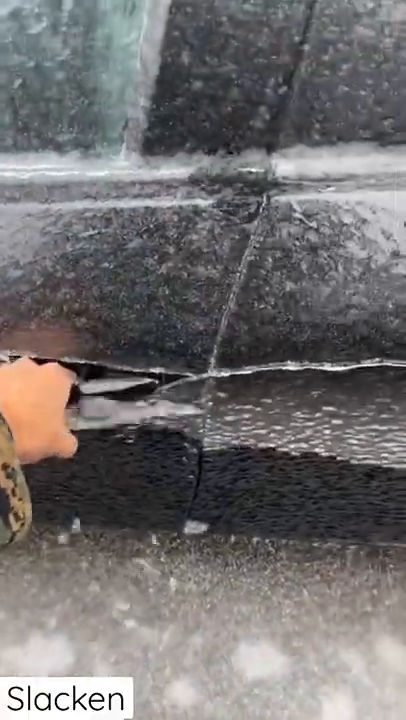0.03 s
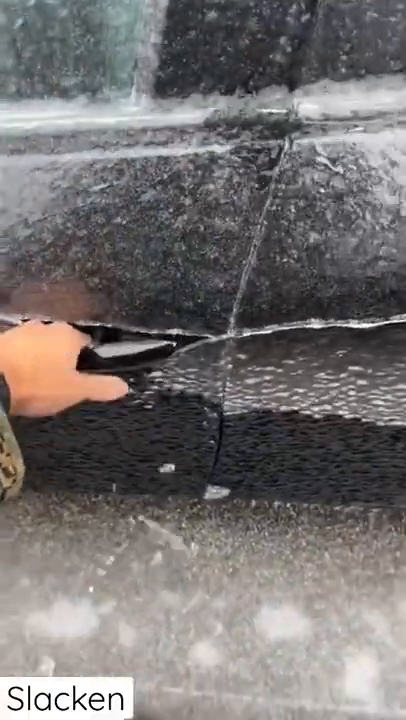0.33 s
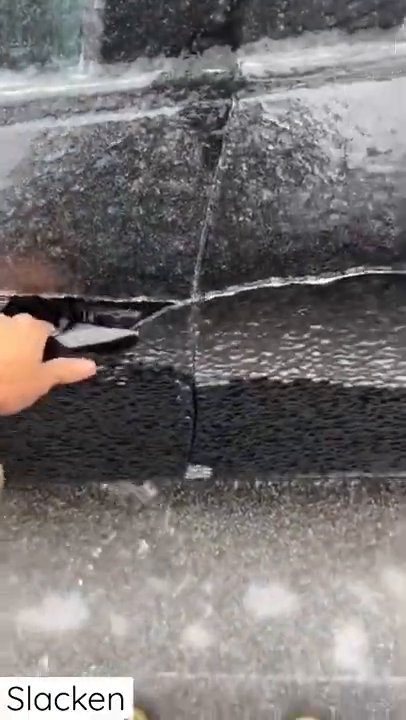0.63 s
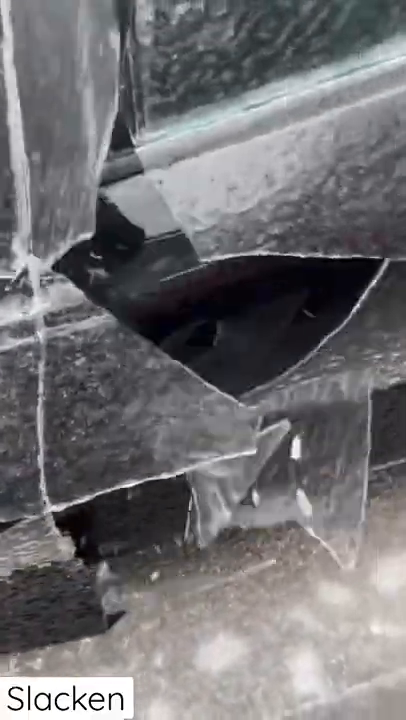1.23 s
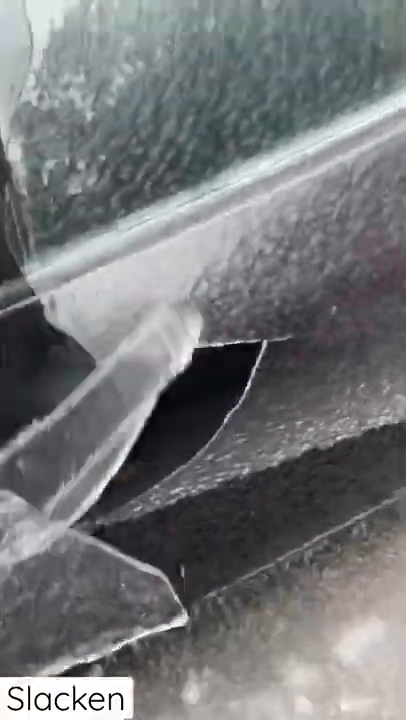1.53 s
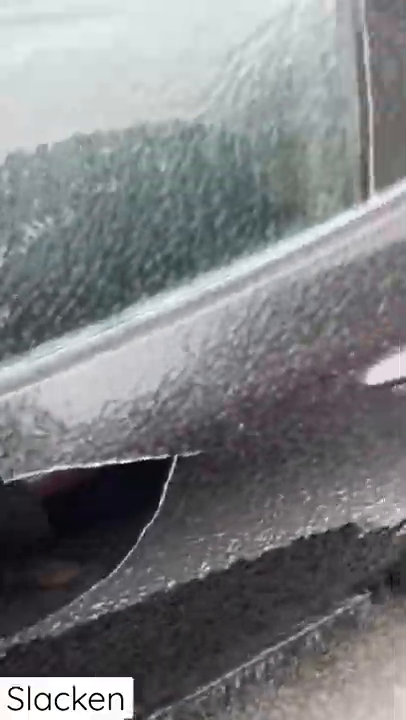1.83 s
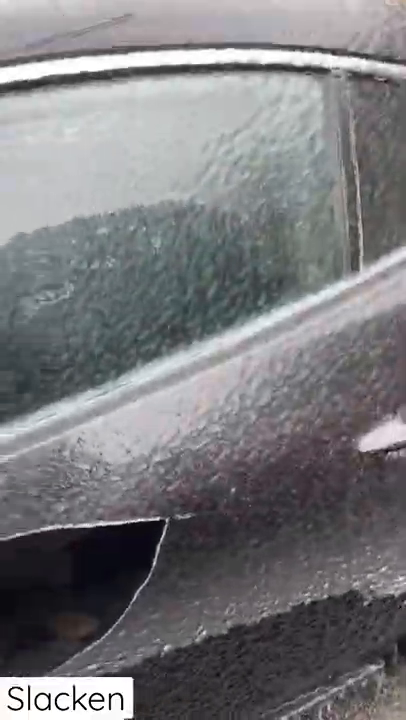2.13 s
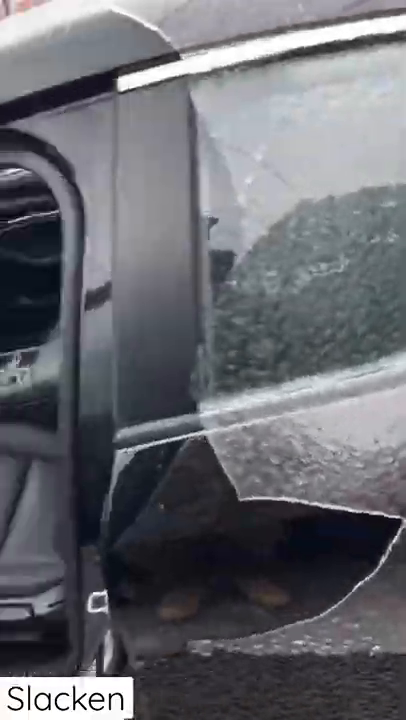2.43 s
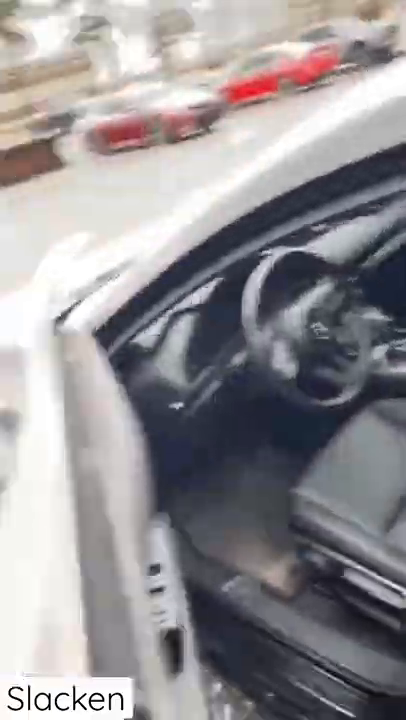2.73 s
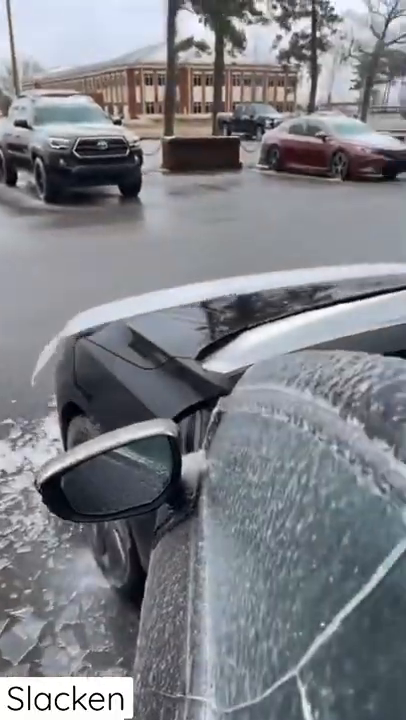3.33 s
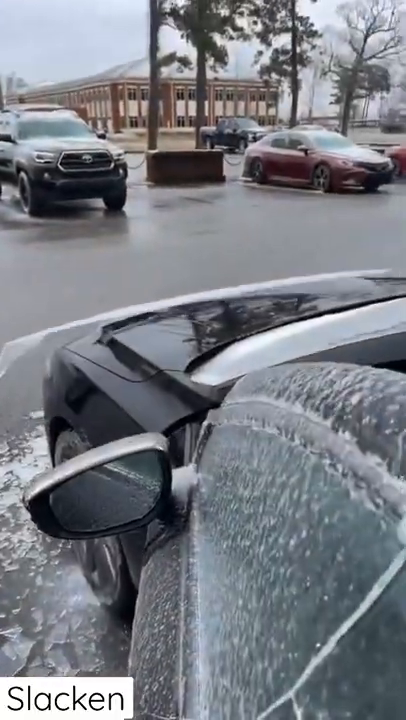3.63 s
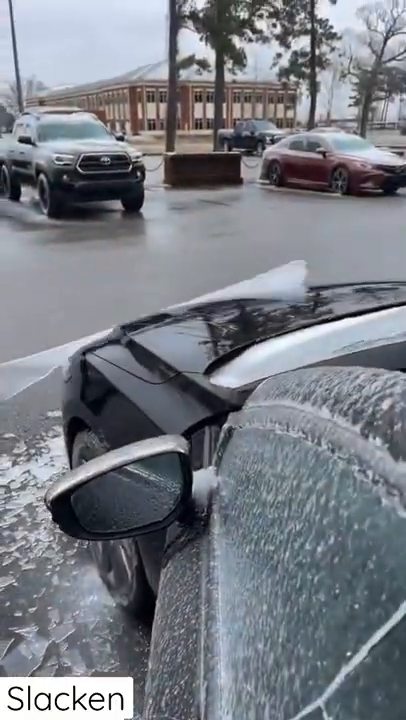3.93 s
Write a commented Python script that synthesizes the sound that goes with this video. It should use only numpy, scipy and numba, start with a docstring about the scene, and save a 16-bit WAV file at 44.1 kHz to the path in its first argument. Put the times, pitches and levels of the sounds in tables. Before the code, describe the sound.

Ice cracks and snaps off a car door as it is pulled open, close to the microphone outdoors. Loose sheets grind and clink, the door thumps, then sheets smash on the asphalt and fragments skitter over light wind rumble.

```python
"""A car door is pulled open through its shell of ice, close to the microphone, in an open car park.
From the start, over faint hiss and the rumble of gusts and movement on the microphone, cracks run
through the shell; fragments skitter, loose sheets grind, knock on the door, snap and clink.
The swinging door thumps at 0.6 s and several times around 2 s. From 2.5 to 3.1 s fallen sheets smash
on the asphalt. Skitter, a few snaps and a last thump at 3.5 s follow."""
import sys
import numpy as np
from scipy import signal
from scipy.fft import rfft, irfft
from scipy.io import wavfile
from scipy.ndimage import uniform_filter1d
from numba import njit

SR = 44100
rng = np.random.default_rng(int(sys.argv[2]) if len(sys.argv) > 2 else 0)


def store_wav(level_fs):
    """Save 16-bit WAV to argv[1]."""
    pcm = np.round(np.clip(np.atleast_2d(level_fs), -1, 1) * 32767)
    wavfile.write(sys.argv[1], SR, pcm.T.astype(np.int16))


N = 4 * SR

# cracks through the shell: start_s, length_s, level_db, fall_db, ring_db
CRACKS = [(0.0, 0.028, -32.5, -0.5, -45), (0.698, 0.14, -18.5, 4, -25.5), (1.2, 0.067, -30.5, 3.5, -27),
          (1.323, 0.05, -11, 17, -28.5), (1.455, 0.058, -15.5, 0.5, -26), (1.646, 0.023, -21.5, -1, -42),
          (1.837, 0.075, -17, 6.5, -22.5), (2.258, 0.053, -17, 10, -31), (2.326, 0.034, -11.5, 7, -21.5)]
# fragments trickling and sliding: time_s, level_db
SKITTER_LEVELS = [(0, -41), (.36, -49), (.41, -47.5), (.695, -41), (.72, -24), (.86, -29), (.94, -33.5),
                  (1.5, -29), (1.92, -27.5), (2.2, -34.5), (2.4, -22), (2.58, -30), (2.68, -21.5),
                  (3.0, -23.5), (3.44, -29), (3.55, -33.5), (3.66, -27), (3.76, -37.5)]
# sheets rubbing: time_s, level_db
GRIND_LEVELS = [(0, -59), (.695, -46), (.72, -26.5), (.92, -39), (1.4, -32), (1.79, -46.5), (2.2, -45),
                (2.7, -35), (3.32, -61), (3.45, -43.5), (3.7, -52)]
# gusts and movement on the microphone: time_s, level_db
RUMBLE_LEVELS = [(.54, -40), (.78, -25), (.86, -38.5), (1.8, -42.5), (2.3, -29), (2.58, -44), (2.67, -22),
                 (2.77, -20.5), (2.84, -34), (3.2, -46.5), (3.53, -39.5), (4, -38)]
# sheets hitting the door: start_s, level_db, pitch_hz, decay_s
DOOR_KNOCKS = [(0.033, -32, 340, 0.014), (0.719, -18, 316, 0.031), (0.768, -20.5, 297, 0.033),
               (1.076, -16.5, 340, 0.015), (1.216, -20.5, 329.4, 0.021), (1.712, -20, 498, 0.01377),
               (2.352, -14.5, 295, 0.014), (2.458, -20.5, 518, .018), (3.428, -30.5, 338.4, 0.028)]
# modes of the iced door: pitch_ratio, gain_db
DOOR_MODES = [(0.582, -10.5), (1.001, 3), (1.25, -1.5), (2.0, -1), (2.7, -4.5)]
# single breaks: time_s, level_db, centre_hz
ICE_SNAPS = [(0.1095, -20, 12000), (0.381, -8, 5000), (0.4365, -14, 4000), (0.538, -25, 10500),
             (0.675, -22, 4700), (0.8235, -9, 4000), (0.8835, -12, 5600), (0.8905, -10, 5600),
             (1.0152, -6, 4500), (1.206, -14, 3200), (1.3685, -8, 5500), (1.443, -14, 7000),
             (1.6398, -7, 4000), (1.8405, -6, 4500), (1.857, -8, 3500), (3.2675, -14, 3000),
             (3.599, -13, 7000), (3.813, -18, 4000), (3.924, -21, 3000)]
# loose plates striking: start_s, level_db, pitch_hz, spread_octaves
PLATE_CLINKS = [(0.3755, -12, 4100, .25), (0.4512, -19, 3850, .08), (0.4833, -29, 1930, .4),
                (0.5685, -14, 1500, .5), (1.853, -11, 1800, .2), (1.0765, -3, 2239, .06),
                (1.102, -14, 2230, .1), (1.284, -13, 1800, .5), (1.562, -16, 1400, .6),
                (1.824, -11, 5600, .08), (2.829, -6, 1520, .22), (2.931, -7, 1750, .2),
                (3.266, -15, 2050, .2)]
# blows of the swinging door: start_s, peak_db, pitch_hz
DOOR_THUMPS = [(0.57, -18.5, 224), (1.928, -21.5, 140), (1.955, -17, 93), (2.066, -14, 100),
               (2.118, -19, 150), (2.165, -17, 83), (3.515, -17.5, 88)]
# sheets hitting the ground: peak_s, decay_s, level_db
SHEET_SMASHES = [(2.468, .012, -15.5), (2.644, 0.015, -16.5), (2.813, 0.0086, -14.5), (2.831, .005, -13.5),
                 (2.908, 0.011, -13), (2.935, .013, -12.5), (3.066, 0.046, -17)]

# source spectra: frequency_hz, relative_db
CRACK_SPECTRUM = [(1000, -15.5), (3200, -4.5), (7500, -4), (9300, -11.5)]
SHEET_SPECTRUM = [(200, -1.5), (800, -3.5), (1900, 4), (4500, -4)]
SHARD_SPECTRUM = [(900, -16), (1700, -3.5), (6000, -1.5), (8200, -6), (9400, -10), (13000, -6.5)]
GRIND_SPECTRUM = [(200, -0.5), (320, 3.5), (490, 1), (650, -0.5), (1050, -1), (1850, -2.5), (4000, -19.5)]
RUMBLE_SPECTRUM = [(25, -18), (62, 0), (95, -5), (170, -20), (1200, -78)]
SMASH_SPECTRUM = [(200, -15.5), (900, -9.5), (1700, -2), (2350, -7), (4000, 0.5), (10000, -13.5)]
AIR_SPECTRUM = [(60, -1), (2400, -23), (6500, 0)]

TIME_S = np.arange(N) / SR


def undb(db):
    return 10 ** (np.asarray(db) / 20)


def unit_rms(x):
    return x / np.sqrt(np.mean(x ** 2) + 1e-18)


def curve(rows):
    """Gain along rows of time_s, level_db."""
    return undb(np.interp(TIME_S, *np.array(rows).T))


def swell(peak_s, rise_s, decay_s):
    """Exponential rise to a peak, then exponential decay."""
    t = TIME_S - peak_s
    return np.exp(np.maximum(np.minimum(t / rise_s, -t / decay_s), -40))


def bandpass(x, centre_hz, q, passes=1):
    for _ in range(passes):
        x = signal.lfilter(*signal.iirpeak(centre_hz, q, fs=SR), x)
    return x


def colour(x, spectrum, taps=8192):
    """Minimum-phase filter that keeps the power of white noise."""
    hz, db = np.array(spectrum).T
    bin_hz = np.arange(taps // 2 + 1) * SR / taps
    gain = undb(np.interp(np.log(bin_hz + 1), np.log(hz), db))
    cepstrum = irfft(np.log(gain))
    cepstrum[1:taps // 2] *= 2
    cepstrum[taps // 2 + 1:] = 0
    impulse = irfft(np.exp(rfft(cepstrum)))
    return signal.fftconvolve(x, impulse / np.linalg.norm(impulse))[:N]


@njit
def ring(start_s, pitch_hz, decay_s, size):
    """Sum of damped sines."""
    out = np.zeros(N)
    for k in range(len(start_s)):
        phasor = size[k] + 0j
        step = np.exp((2j * np.pi * pitch_hz[k] - 1 / decay_s[k]) / SR)
        first = int(start_s[k] * SR)
        for i in range(first, min(N, first + int(6 * decay_s[k] * SR))):
            out[i] += phasor.imag
            phasor *= step
    return out


def grains(force, top_hz, decay_s, scatter_db, count):
    """Tiny breaks at random times, scaled by the force; low ones ring longer."""
    when, height, length, strength, side = rng.random((count, 5)).T
    pitch_hz = 100 + (top_hz - 100) * height ** 2
    ring_s = decay_s * 2 ** (2 * length - 1) * np.sqrt(np.median(pitch_hz) / pitch_hz)
    size = unit_rms(np.sqrt(height) * undb(-scatter_db * np.log(strength + .02)))
    size *= np.sign(side - .5) * force[(when * N).astype(int)]
    overlap = count * ring_s * SR / N
    return 2 * ring(when * N / SR, pitch_hz, ring_s, size / np.sqrt(overlap))


def clumps(window_s=0.016, depth_db=1.28):
    """Pieces come in random bunches: a gain flickering around 1."""
    flicker = uniform_filter1d(rng.standard_normal(N), int(window_s * SR))
    return undb(depth_db * unit_rms(flicker))


def cracks(rise_s=0.0024, release_s=0.007):
    """Each crack is an avalanche of tiny breaks that also rings the sheet."""
    break_force, sheet_force = np.zeros((2, N))
    for start_s, length_s, level_db, fall_db, ring_db in CRACKS:
        age_s = TIME_S - start_s
        run = np.clip(age_s / rise_s, 0, 1)
        run *= undb(-fall_db * np.clip(age_s / length_s, 0, 1))
        run *= np.exp(-np.clip((age_s - length_s) / release_s, 0, 20))
        break_force += undb(level_db) * run
        sheet_force += undb(ring_db) * run
    breaks = grains(break_force, top_hz=14700, decay_s=0.00018, scatter_db=1, count=32000)
    sheet = grains(sheet_force, top_hz=4114, decay_s=0.0044, scatter_db=3, count=6000)
    return colour(breaks, CRACK_SPECTRUM) + colour(sheet, SHEET_SPECTRUM)


def skitter():
    """Crumbs hiss over the ground; larger shards tick among them in bunches."""
    flow = curve(SKITTER_LEVELS) * clumps()
    crumbs = grains(flow, top_hz=12750, decay_s=0.00042, scatter_db=4.5, count=40000)
    shards = grains(flow * clumps(), top_hz=8960, decay_s=0.01, scatter_db=5, count=2400)
    return colour(undb(-0.5) * crumbs + undb(-8.5) * shards, SHARD_SPECTRUM)


def grind():
    """Large sheets rub and crunch dully against each other."""
    force = curve(GRIND_LEVELS) * clumps()
    crunch = grains(force, top_hz=4415, decay_s=0.0024, scatter_db=3.5, count=6000)
    return colour(crunch, GRIND_SPECTRUM)


def rumble(buffet_db=-29.5):
    """Gusts and movement rumble on the microphone; the strongest also buffet in the upper bass."""
    gust = curve(RUMBLE_LEVELS)
    buffet = unit_rms(bandpass(rng.standard_normal(N), centre_hz=184, q=1.6, passes=2))
    deep = colour(rng.standard_normal(N), RUMBLE_SPECTRUM)
    return gust * deep + undb(buffet_db) * (gust / gust.max()) ** 1.5 * buffet


def air(level_db=-47):
    """Faint, steady outdoor hiss."""
    return undb(level_db) * colour(rng.standard_normal(N), AIR_SPECTRUM)


def knocks(contacts=8):
    """A sheet hits the door and chatters on it, ringing the damped panel."""
    out = np.zeros(N)
    for start_s, level_db, pitch_hz, decay_s in DOOR_KNOCKS:
        lag, size, detune = rng.standard_normal((3, contacts))
        lag_s = np.abs(lag) * decay_s
        lag_s[0], size[0] = 0, 2  # main hit
        size *= np.exp(-lag_s / decay_s)
        size /= np.linalg.norm(size)
        for ratio, gain_db in DOOR_MODES:
            mode_hz = pitch_hz * ratio * (1 + 0.1 * detune)
            ring_s = np.full(contacts, 0.85 * decay_s / np.sqrt(ratio))
            out += ring(start_s + lag_s, mode_hz, ring_s, undb(level_db + gain_db) * size)
    return uniform_filter1d(out, 4)


def snaps(width_hz=4800):
    """A sharp break with a few milliseconds of splintering; thin ice snaps higher."""
    out = np.zeros(N)
    for time_s, level_db, centre_hz in ICE_SNAPS:
        force = undb(level_db) * swell(time_s, rise_s=0.0001, decay_s=0.0053)
        out += bandpass(force * rng.standard_normal(N), centre_hz, q=centre_hz / width_hz)
    return out


def clinks(mode_count=7, decay_s=0.0045, chatter_s=0.0017, scuff_db=-7):
    """Loose plates scuff and rattle in a cluster of modes: a tight one clinks, a wide one clacks."""
    out = np.zeros(N)
    for start_s, level_db, pitch_hz, spread_octaves in PLATE_CLINKS:
        lag, detune = rng.random((2, mode_count))
        position = 2 * (np.arange(mode_count) + detune) / mode_count - 1
        mode_hz = pitch_hz * 2 ** (spread_octaves * position)
        onset_s = start_s + lag ** 2 * chatter_s
        modes = ring(onset_s, mode_hz, np.full(mode_count, decay_s), np.ones(mode_count))
        contact = swell(start_s, rise_s=0.00013, decay_s=chatter_s)
        scuff = bandpass(contact * rng.standard_normal(N), pitch_hz, q=2)
        out += undb(level_db) * (modes / np.abs(modes).max() + undb(scuff_db) * scuff)
    return out


def thumps(decay_s=0.011):
    """Soft, rough blows swell and die within a few cycles of the damped door."""
    out = np.zeros(N)
    for start_s, peak_db, pitch_hz in DOOR_THUMPS:
        age = np.maximum(TIME_S - start_s, 0) / decay_s
        blow = age * np.exp(-age) * bandpass(rng.standard_normal(N), pitch_hz, q=1, passes=2)
        out += undb(peak_db) * blow / np.abs(blow).max()
    return out


def smashes():
    """Fallen sheets burst into many short-ringing pieces; the larger ones clatter."""
    power = np.zeros(N)
    for peak_s, decay_s, level_db in SHEET_SMASHES:
        power += (undb(level_db) * swell(peak_s, decay_s, decay_s)) ** 2
    force = np.sqrt(power)
    plates = grains(force, top_hz=2170, decay_s=0.0036, scatter_db=3, count=2400)
    pieces = grains(force, top_hz=13940, decay_s=0.0014, scatter_db=0, count=22000)
    return colour(pieces, SMASH_SPECTRUM) + bandpass(plates, centre_hz=1680, q=2, passes=2)


def reflections(x, decay_s=0.014, level_db=-14.5):
    """Short scatter off the car and the ground."""
    t = TIME_S[:SR // 4]
    impulse = rng.standard_normal(len(t)) * np.exp(-t / decay_s)
    return undb(level_db) * signal.fftconvolve(x, impulse / np.linalg.norm(impulse))[:N]


def scene():
    """Mono mix: ice and its reflections, hiss, door, rumble."""
    ice = cracks() + snaps() + clinks() + knocks() + skitter() + smashes() + grind()
    return (ice + reflections(ice) + air() + thumps() + rumble())[None]


def record(dry, low_hz=28, top_hz=13250, drive=0.8):
    """High-pass, soft clip, steep low-pass."""
    highpass = signal.butter(2, low_hz, "highpass", fs=SR, output="sos")
    lowpass = signal.ellip(10, .2, 80, top_hz, fs=SR, output="sos")
    rounded = np.tanh(drive * signal.sosfilt(highpass, dry)) / drive
    return signal.sosfilt(lowpass, rounded)


dry = scene()
out = record(dry)
store_wav(out)
```